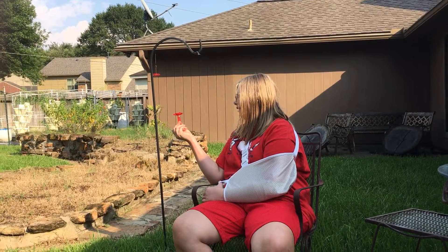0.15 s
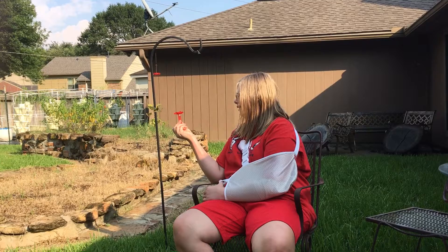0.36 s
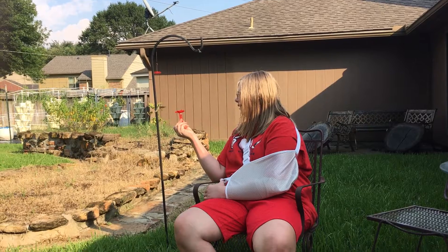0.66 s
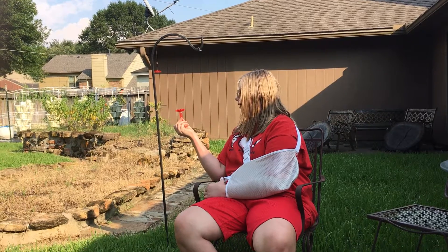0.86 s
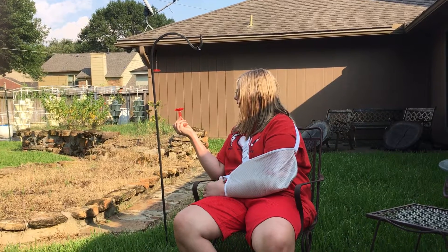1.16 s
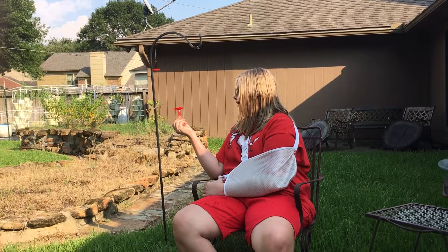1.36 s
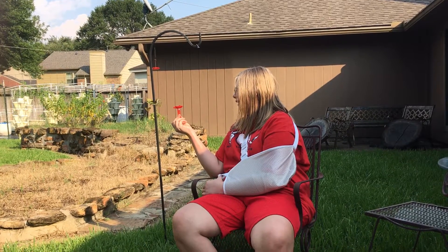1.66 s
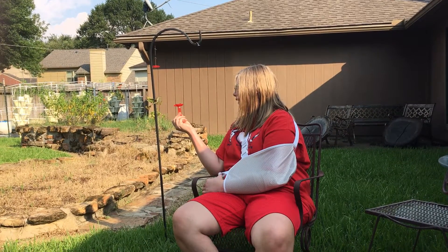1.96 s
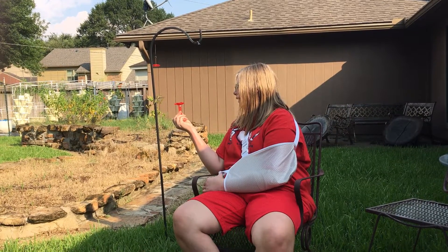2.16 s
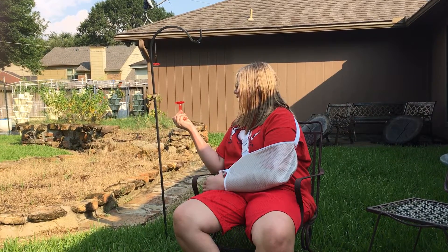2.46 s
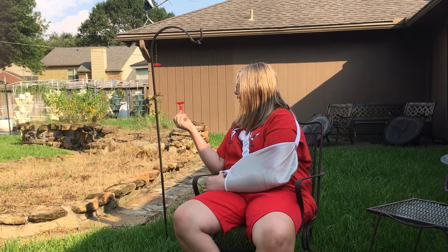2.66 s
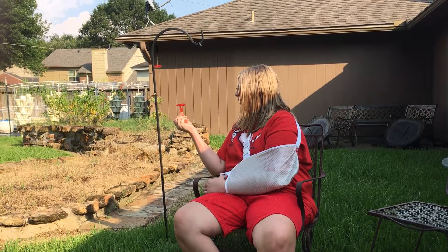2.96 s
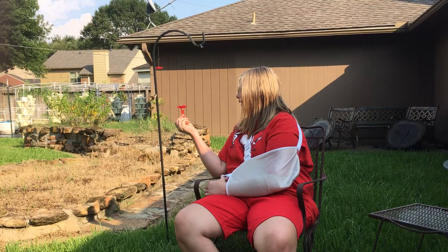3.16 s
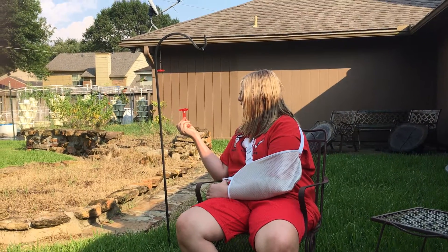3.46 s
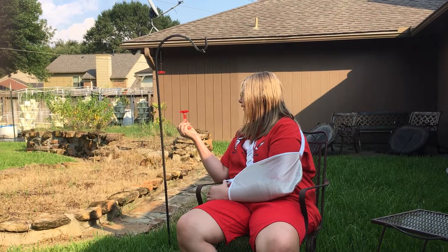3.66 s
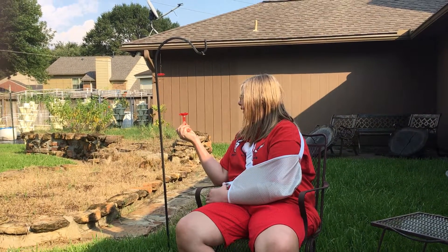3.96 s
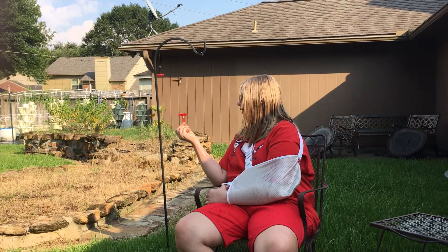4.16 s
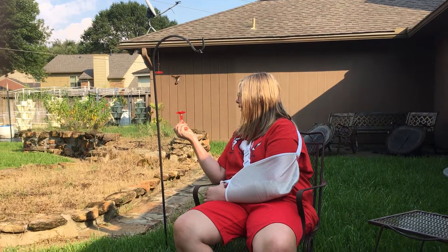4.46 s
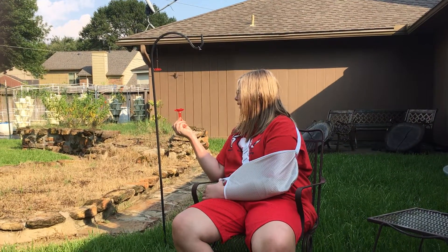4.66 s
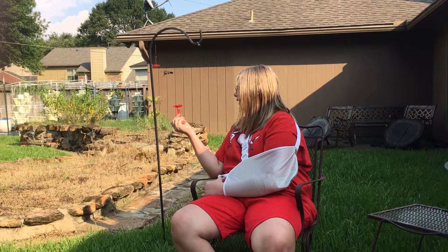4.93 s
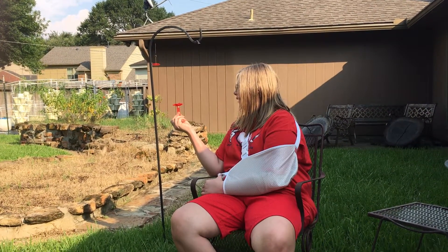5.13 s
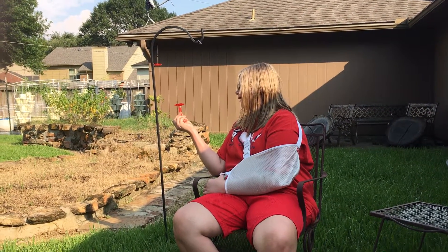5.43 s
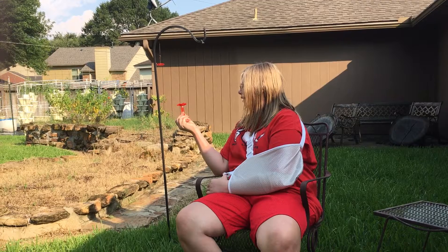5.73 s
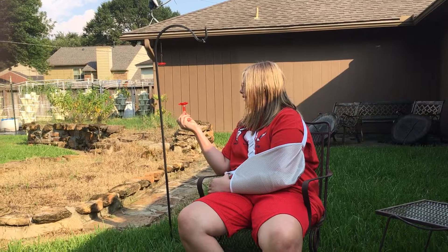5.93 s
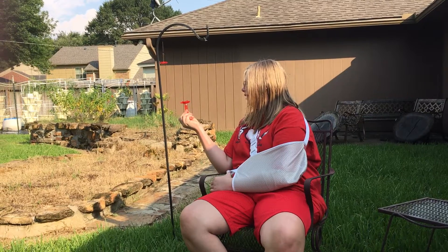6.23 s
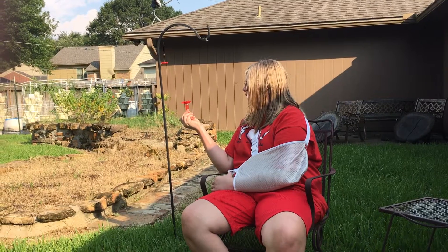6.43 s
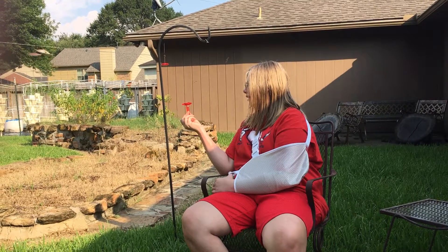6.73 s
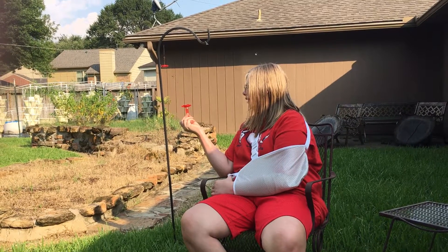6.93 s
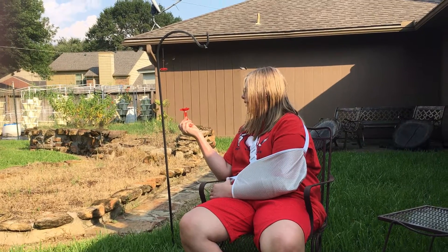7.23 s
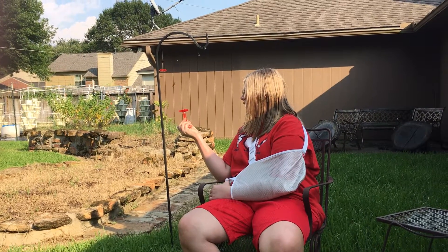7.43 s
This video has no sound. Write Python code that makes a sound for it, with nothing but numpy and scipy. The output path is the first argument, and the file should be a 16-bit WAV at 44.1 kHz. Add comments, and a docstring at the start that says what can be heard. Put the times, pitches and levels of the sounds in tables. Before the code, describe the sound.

Small hummingbirds chatter around a backyard feeder over steady motor hum and swelling traffic rumble. Isolated dry chips begin quietly alongside a grainy far scold. Around the middle come sudden squeaky bursts: needle-thin whistles, stuttering upward trills, tiny raspy buzzes and falling chips. The yard calms to scattered chips, then closes with louder chips, whistles and one quick trill. House wall and fences return short echoes; the handheld outdoor pickup has light hiss.

```python
"""A backyard feeder: first a few short falling chips, each a stack of partials, and a far bird's noisy rasp.
Then hummingbirds chase each other with thin gliding whistles, trills of quick upward hooks, harsh buzzes of
shaken partials and more chips; near the end come a slightly rising pip, two close whistles and a last trill.
The house wall and the fences throw every call back as delayed copies and a decaying noise tail.
Throughout lie air-conditioner tones, resonant traffic rumble, an engine note and shaped-noise hiss.
"""
import sys
import numpy as np
from scipy import signal
from scipy.fft import rfft, irfft
from scipy.io import wavfile

SR = 44100
rng = np.random.default_rng(int(sys.argv[2]) if len(sys.argv) > 2 else 0)


def generate_wav(signal):
    """Clip the signal to [-1, 1] and save it as 16-bit WAV at the path in sys.argv[1]."""
    frames = np.transpose(np.atleast_2d(signal))
    scaled = np.clip(frames, -1, 1) * 32767
    pcm = np.round(scaled).astype(np.int16)
    wavfile.write(sys.argv[1], SR, pcm)


N = 334695  # length [samples]

# Whistles: (time [s], length [s], attack [s], first pitch [Hz], held pitch [Hz], climb [Hz/s],
# starting level [dB], starting octave against the tone [dB], unsteadiness [share of pitch])
WHISTLES = [(2.709, 0.077, .006, 6870, 6960, 1000, -51, -0.5, 0.0034),
            (4.164, 0.067, 0.0065, 7560, 6905, 5000, -44.5, -10, 0.0087),
            (6.711, 0.1, .028, 7230, 7270, 1704, -46, -1, 0.011),
            (7.326, 0.098, 0.029, 7470, 7050, -3, -40, -5.5, 0.01),
            (7.413, 0.11, .008, 7090, 7140, 1098, -43, -1, 0.0081)]
WHISTLE_FADE_DB_PER_S, OCTAVE_FADE_DB_PER_S = 80, 75  # the octave's fade comes on top of the tone's
SETTLE_S, WHISTLE_RELEASE_S = 0.012, 0.0033  # the pitch settles, the tone stops

# Trills: (first hook [s], last hook [s], hooks [count], rise time constant [s], low pitch [Hz],
# top pitch [Hz], level [dB], octave [dB])
TRILLS = [(2.81, 2.818, 2, 0.0016, 4900, 6800, -56, -5), (2.836, 2.924, 9, 0.0012, 3970, 7100, -46.5, -5.5),
          (4.347, 4.442, 9, 0.0027, 5800, 7860, -50.5, -12),
          (4.789, 4.842, 6, 0.0019, 5660, 7180, -49, -9.5),
          (7.476, 7.557, 8, 0.0014, 4260, 7200, -46.5, -7.5)]
HOOK_S = 0.0065  # length of one upward hook
BEAK_HZ, BEAK_WIDTH_HZ = 6800, 3000  # resonance that favours the top of each hook

# Buzzes: (time [s], length [s], attack [s], level [dB], bass turn [dB], treble turn [dB])
BUZZES = [(2.975, .059, .003, -50, .5, 1), (3.285, 0.062, .003, -51.5, 0, -0.5),
          (4.498, .07, 0.019, -56.5, 0, -1)]
# Open-beak colour of the buzzes: (frequency [Hz], gain [dB])
OPEN_BEAK = [(1800, -30), (2500, -2.5), (3200, -14.5), (4100, -3), (5000, -12), (6300, 1.5), (8200, 0),
             (10500, -7), (13000, -5.5), (16000, -6.5)]

# Short, slightly rising pips: (time [s], length [s], first pitch [Hz], last pitch [Hz], level [dB])
PIPS = [(7.022, 0.0353, 2990, 3150, -49.5)]
# Pip partials 1 to 4: (level against the pip [dB])
PIP_PARTIALS_DB = [-32, -0.5, -18, -16]

# Falling chips: (time [s], length [s], first pitch [Hz], last pitch [Hz], level [dB],
# bass as the head turns [dB])
CHIPS = [(0.296, 0.014, 1940, 1390, -61, 6), (.59, 0.015, 2190, 1510, -63, 0),
         (1.119, 0.018, 1965, 1390, -63.5, 6), (1.386, 0.014, 1920, 1394, -64, 7),
         (3.1, .026, 3150, 1560, -58.5, 3.5), (3.181, 0.024, 3130, 1524, -57.5, 5.5),
         (4.027, 0.014, 1925, 1400, -61.5, 7), (4.119, 0.013, 2040, 1394, -56.5, 5),
         (4.608, 0.013, 2840, 1950, -61.5, 12), (4.675, 0.023, 2904, 1920, -64, 8.5),
         (4.965, 0.017, 2820, 2150, -63.5, 7), (5.04, 0.021, 2770, 1700, -65.5, 5),
         (5.317, 0.021, 1990, 1380, -66, 4), (6.094, 0.018, 1810, 1446, -61, 4),
         (6.208, 0.02, 2100, 1440, -56.5, 3), (6.916, 0.018, 1986, 1310, -53, 4),
         (7.048, 0.024, 1865, 1383, -56, 2)]
# Throat colour of the chips: (frequency [Hz], gain [dB])
THROAT = [(1400, -9), (2700, -8.5), (4000, -10), (5000, -1.5), (6200, 2.5), (8000, -5), (10500, -5),
          (13500, -12), (16000, -5)]
CHIP_BEND, CHIP_SHAKE = 1.3, 0.016  # curvature of the fall; unsteadiness [share of pitch]
CHIP_TREBLE_DB, TREBLE_DB_PER_OCTAVE = -6, 12  # treble for a 2 kHz start; higher starts are brighter
CHASE_CHIP_HZ = 2500  # chips that start this high or higher are chase chatter

# Ticks where the voice breaks: (time [s], level [dB])
TICKS = [(2.744, -59), (4.168, -61), (4.228, -60), (4.847, -61), (6.727, -66), (7.417, -61), (7.539, -58)]
# Far scolding, and a short low tick at 5.65 s:
# (time [s], length [s], centre [Hz], width of each resonance pass [Hz], level [dB])
SCOLDS_AND_LOW_TICK = [(0.512, 0.03, 2830, 700, -59), (0.561, 0.053, 2480, 1110, -56.5),
                       (0.688, 0.031, 2550, 600, -65.5), (2.209, 0.14, 2680, 2000, -69),
                       (5.652, 0.021, 2560, 1800, -59)]

# Echoes off wall and fences: (delay [s], level [dB])
ECHOES = [(.013, -7), (0.034, -15), (.06, -37)]
YARD_DB, YARD_T60_S, YARD_CUT_HZ = -0.5, 0.43, 12000  # scattered tail; treble cut on all echoes
HOVER_ECHO_DB, WETTER_ECHO_DB = -2.5, 1.5  # send from calls near the feeder; send from the trills, buzzes, high chips and scolds

# Steady motor and fan tones: (frequency [Hz])
MOTOR_HZ = [87.3, 95, 120, 145.3, 176.8, 204.3, 217.5, 254.3, 296, 359, 417]
# Their loudness, in the same order: (rms level [dB])
MOTOR_DB = [-62, -64.5, -53.5, -58.5, -57, -65, -67.5, -64.5, -69.5, -79, -81]
# Low resonances in the traffic rumble: (centre [Hz], width of each pass [Hz], relative gain [dB])
RUMBLE = [(54.1, 17, -4.5), (65.64, 5.9, -1)]
# Slow level moves of the drone: (time [s], rumble [dB], far engine note [dB])
DRONE = [(0.0, -64, -51), (0.7, -78, -49), (1.58, -55.5, -66), (2.36, -65, -50), (2.75, -56.5, -67),
         (4.42, -51, -63), (5.32, -52, -49.5), (6.55, -58.5, -46.5), (7.08, -51.5, -55), (7.59, -52, -67)]
ENGINE_HZ, ENGINE_WIDTH_HZ = 136.26, 2.05  # width of each resonance pass
# Colour of the air bed: (frequency [Hz], relative level [dB])
AIR = [(15, -54), (25, -22), (59, 1), (126, -2), (262, -12), (463, -23.5), (986, -20.5), (1480, -28.5),
       (1990, -31), (2340, -29), (4850, -38.5), (6360, -38.5), (10300, -45), (14700, -42), (15900, -43.5)]
AIR_DB = -48  # rms level of the whole bed

# Dips of the microphone port: (frequency [Hz], width [Hz], depth [0-1])
MIC_DIPS = [(4870, 110, 0.56), (10500, 700, 0.3)]
CUTOFF_HZ = 16200  # stopband edge


def from_db(db):
    """dB to gain."""
    return 10 ** (np.asarray(db) / 20)


def rms_one(x):
    """Scale to rms 1."""
    return x / np.sqrt(np.mean(x ** 2) + 1e-20)


def at_hz(points, hz):
    """Read a spectrum on a log-frequency axis."""
    points = np.array(points)
    return np.interp(np.log(hz), np.log(points[:, 0]), points[:, 1])


def add(out, s, note):
    """Mix a note in at time s."""
    i = round(s * SR)
    out[i:i + len(note)] += note[:N - i]


def swell(length, attack, release):
    """Time axis and envelope with rounded edges."""
    t = np.arange(round(length * SR)) / SR
    edge = np.minimum(t / attack, (length - t) / release)
    return t, np.sin(np.pi / 2 * np.clip(edge, 0, 1)) ** 2


def resonate(x, hz, width_hz):
    """Two-pole resonance, gain 1 on top."""
    r = np.exp(-np.pi * width_hz / SR)
    zeros = np.array([1, 0, -1]) * (1 - r * r) / 2
    poles = [1, -2 * r * np.cos(2 * np.pi * hz / SR), r * r]
    return signal.lfilter(zeros, poles, x)


def resonate_twice(x, hz, width_hz):
    """The same resonance in two passes, for steeper skirts."""
    return resonate(resonate(x, hz, width_hz), hz, width_hz)


def low_pass(x, hz):
    """Gentle treble cut."""
    return signal.sosfilt(signal.butter(2, hz, fs=SR, output="sos"), x)


def wobble(size, hz):
    """Low-passed noise of rms 1, taken after the filter has warmed up."""
    return rms_one(low_pass(rng.standard_normal(size + 4000), hz)[4000:])


def phase_of(pitch):
    """Add up a moving pitch [Hz] into phase [rad]."""
    return 2 * np.pi * np.cumsum(pitch) / SR


def partials(pitch, shape, bass_db, treble_db):
    """A stack of partials, each weighted by the throat; turning the head changes bass and treble."""
    phase, k = phase_of(pitch), np.arange(1, 17)[:, None]
    hz = k * pitch
    turn_db = at_hz([(3000, bass_db), (5500, 0), (7000, 0), (11000, treble_db)], hz)
    gain = from_db(at_hz(shape, hz) + turn_db)
    below_limit = hz < SR / 2.4  # keeps the top partials from aliasing
    return np.sum(gain * below_limit * np.sin(k * phase), axis=0)


def whistles():
    """Near-pure tones with an octave: the pitch settles, climbs and quivers; the octave fades first."""
    out = np.zeros(N)
    for s, length, attack, first, held, climb, level_db, octave_db, quiver in WHISTLES:
        t, env = swell(length, attack, WHISTLE_RELEASE_S)
        pitch = held + (first - held) * np.exp(-t / SETTLE_S) + climb * t
        phase = phase_of(pitch * (1 + quiver * wobble(len(t), 220)))
        octave = from_db(octave_db - OCTAVE_FADE_DB_PER_S * t) * np.sin(2 * phase)
        fade = from_db(level_db - WHISTLE_FADE_DB_PER_S * t)
        add(out, s, np.sqrt(2) * env * fade * (np.sin(phase) + octave))
    return out


def trills():
    """Each puff sweeps up within a few ms and droops; the trill swells and fades, no two puffs alike."""
    out = np.zeros(N)
    for first, last, notes, rise, low, top, level_db, octave_db in TRILLS:
        times, period = np.linspace(first, last, round(notes), retstep=True)
        for s in times:
            t, env = swell(HOOK_S, 0.00022, 0.0039)
            late, sharp, loud = rng.standard_normal(3)
            droop = 400 * (t / period) ** 2
            pitch = top - (top - low) * np.exp(-t / rise) - droop
            phase = phase_of(pitch * (1 + 0.012 * sharp + 0.03 * wobble(len(t), 900)))
            tone = resonate(np.sin(phase), BEAK_HZ, BEAK_WIDTH_HZ)
            octave = from_db(octave_db) * np.sin(2 * phase)
            bright_noise = np.diff(rng.standard_normal(len(t) + 1))
            air_puff = from_db(-14) * np.exp(-t / 0.0015) * bright_noise  # at the start of the hook
            fade = np.sin(np.pi * (s - first + period) / (last - first + 2 * period))
            gain = from_db(level_db + 1.5 * loud) * fade
            add(out, s + 0.0004 * late, gain * env * (tone + octave + air_puff))
    return out


def buzzes():
    """The membranes beat chaotically: random pitch shake smears the partials into harsh, dying noise."""
    out = np.zeros(N)
    for s, length, attack, level_db, bass_db, treble_db in BUZZES:
        t, env = swell(length, attack, 0.041)
        pitch = 1100 * np.exp(0.18 * wobble(len(t), 292.5))
        harsh = rms_one(partials(pitch, OPEN_BEAK, bass_db, treble_db))
        add(out, s, from_db(level_db) * env * harsh)
    return out


def pips():
    """A short, slightly rising pip whose second partial sits on the throat resonance."""
    out = np.zeros(N)
    for s, length, first, last, level_db in PIPS:
        t, env = swell(length, 0.0074, 0.004)
        phase = phase_of(first + (last - first) * t / length)
        tone = sum(from_db(level_db + db) * np.sin(k * phase)
                   for k, db in enumerate(PIP_PARTIALS_DB, start=1))
        add(out, s, env * tone)
    return out


def chips(rows):
    """The membranes slacken and the pitch falls, a little unsteadily."""
    out = np.zeros(N)
    for s, length, first, last, level_db, bass_db in rows:
        t, env = swell(length, 0.0027, 0.0051)
        fall = last + (first - last) * (1 - t / length) ** CHIP_BEND
        pitch = fall * (1 + CHIP_SHAKE * wobble(len(t), 300))
        treble_db = CHIP_TREBLE_DB + TREBLE_DB_PER_OCTAVE * np.log2(first / 2000)
        flutter = from_db(level_db + 1.5 * wobble(len(t), 300))
        add(out, s, flutter * env * partials(pitch, THROAT, bass_db, treble_db))
    return out


def ticks():
    """Bright puffs of air, a few ms long: noise through a wide high resonance."""
    out = np.zeros(N)
    for s, level_db in TICKS:
        t, env = swell(0.004, 0.001, 0.003)
        puff = rms_one(resonate(rng.standard_normal(len(t)), 8500, 7000))
        add(out, s, from_db(level_db) * env * puff)
    return out


def scolds_and_low_tick():
    """Grainy far scolding and one short low tick: noise through a wide resonance, its level shaken."""
    out = np.zeros(N)
    for s, length, hz, width_hz, level_db in SCOLDS_AND_LOW_TICK:
        t, env = swell(length, 0.008, 0.02)
        rasp = rms_one(resonate_twice(rng.standard_normal(len(t)), hz, width_hz))
        grain = from_db(level_db + 2.5 * wobble(len(t), 150))
        add(out, s, grain * env * rasp)
    return out


def yard(hover, wetter):
    """A few distinct echoes and a scattered, duller tail; stronger for the trills, buzzes, high chips and
    scolds."""
    t = np.arange(SR // 2) / SR
    tail = rng.standard_normal(len(t)) * from_db(-60 * t / YARD_T60_S) * np.clip(t / 0.0033, 0, 1)
    response = from_db(YARD_DB) * tail / np.sqrt(np.sum(tail ** 2))
    for delay, echo_db in ECHOES:
        response[round(delay * SR)] += from_db(echo_db)
    response = low_pass(response, YARD_CUT_HZ)
    send = hover * from_db(HOVER_ECHO_DB) + wetter * from_db(WETTER_ECHO_DB)
    return hover + wetter + signal.fftconvolve(send, response)[:N]


def drone_gain(column):
    """Glide between the drone levels of one table column, in dB."""
    points = np.array(DRONE)
    return from_db(np.interp(np.arange(N) / SR, points[:, 0], points[:, column]))


def motors():
    """Steady air-conditioner motor and fan tones: sines with random starting phases."""
    t = np.arange(N) / SR
    return sum(np.sqrt(2) * from_db(db) * np.sin(2 * np.pi * (hz * t + rng.random()))
               for hz, db in zip(MOTOR_HZ, MOTOR_DB))


def rumble():
    """Traffic rumble: noise through low resonances, swelling and sinking."""
    body = sum(from_db(db) * resonate_twice(rng.standard_normal(N), hz, width)
               for hz, width, db in RUMBLE)
    return drone_gain(1) * rms_one(body)


def engine():
    """A far engine note: noise through a resonance so narrow that it becomes a wavering tone."""
    note = resonate_twice(rng.standard_normal(N), ENGINE_HZ, ENGINE_WIDTH_HZ)
    return drone_gain(2) * rms_one(note)


def air():
    """Smooth far traffic, fans and microphone hiss: noise with a shaped spectrum."""
    hz = np.maximum(np.arange(N // 2 + 1) * SR / N, 1)
    shaped = rfft(rng.standard_normal(N)) * from_db(at_hz(AIR, hz))
    return from_db(AIR_DB) * rms_one(irfft(shaped, N))


def scene():
    """Birds in the yard over hum and hiss, as one channel."""
    low_chips = [c for c in CHIPS if c[2] < CHASE_CHIP_HZ]
    high_chips = [c for c in CHIPS if c[2] >= CHASE_CHIP_HZ]
    hover = whistles() + pips() + chips(low_chips) + ticks()
    wetter = trills() + buzzes() + chips(high_chips) + scolds_and_low_tick()
    hum = motors() + rumble() + engine()
    return (yard(hover, wetter) + hum + air())[None]


def record(dry):
    """The microphone port takes out two dips by subtracting resonances; the top is cut steeply."""
    for hz, width_hz, depth in MIC_DIPS:
        dry = dry - np.clip(depth, 0, 0.9) * resonate(dry, hz, width_hz)
    return signal.sosfilt(signal.cheby2(24, 70, CUTOFF_HZ, fs=SR, output="sos"), dry)


dry = scene()
out = record(dry)
generate_wav(out)
```